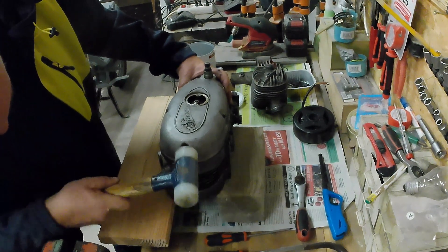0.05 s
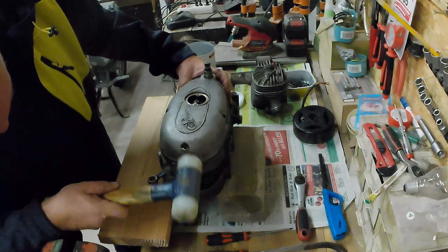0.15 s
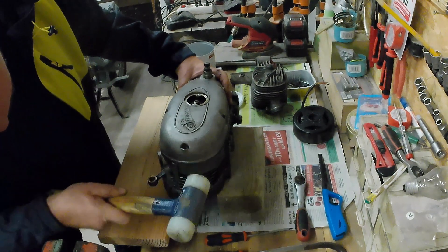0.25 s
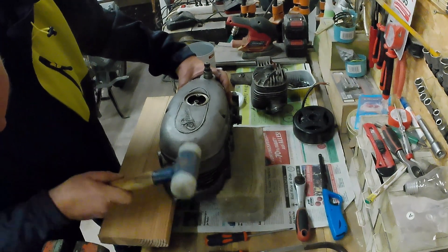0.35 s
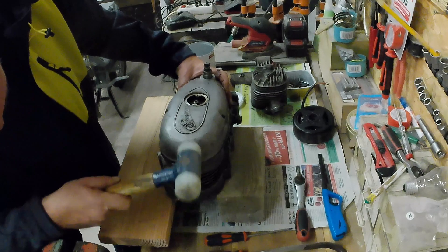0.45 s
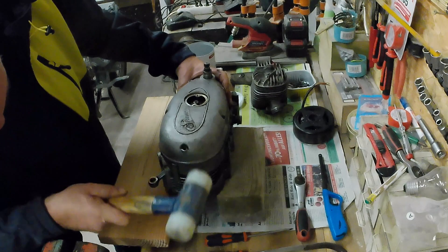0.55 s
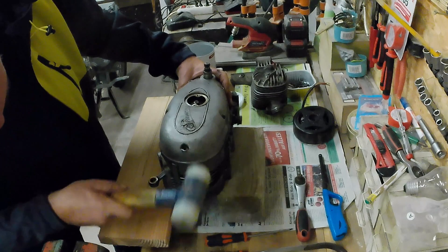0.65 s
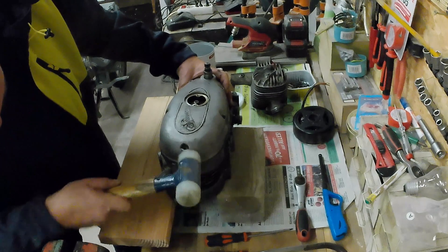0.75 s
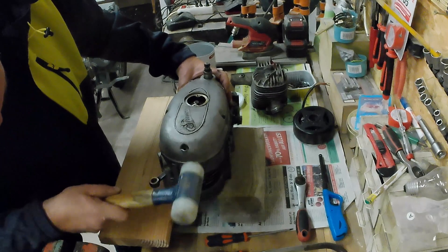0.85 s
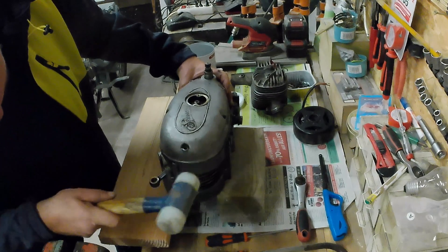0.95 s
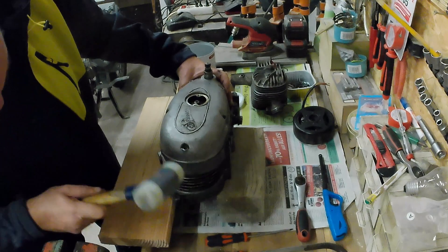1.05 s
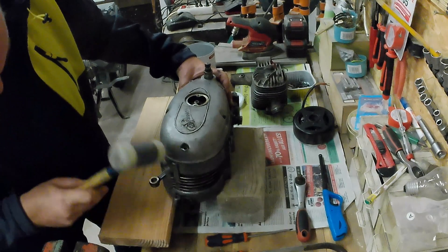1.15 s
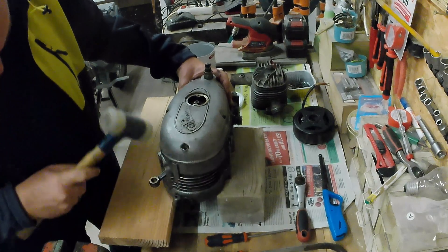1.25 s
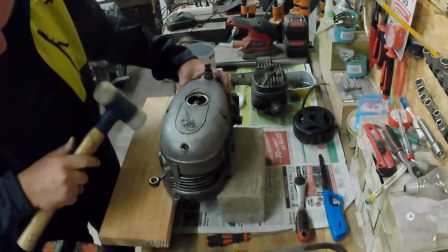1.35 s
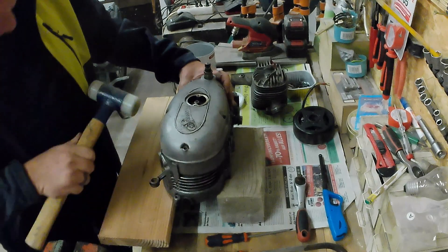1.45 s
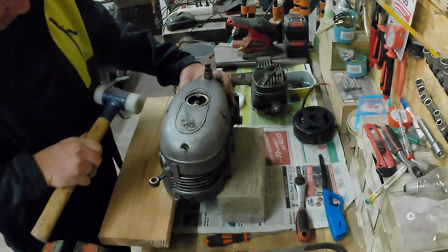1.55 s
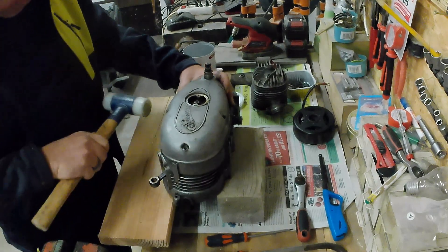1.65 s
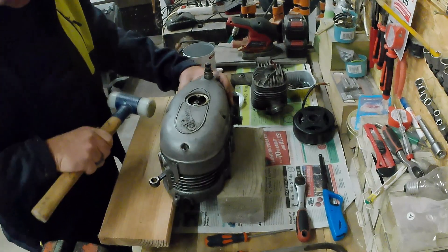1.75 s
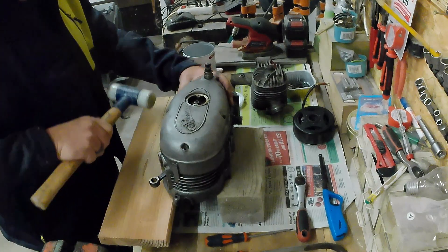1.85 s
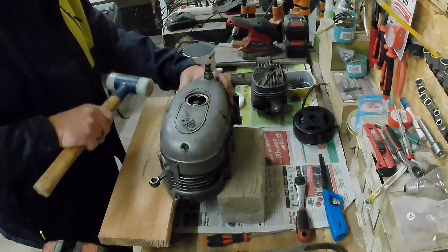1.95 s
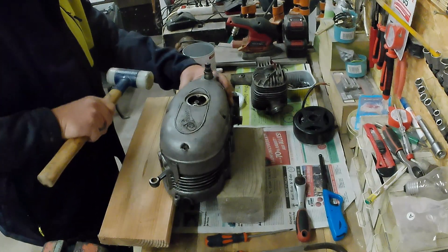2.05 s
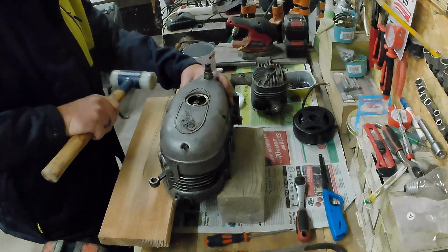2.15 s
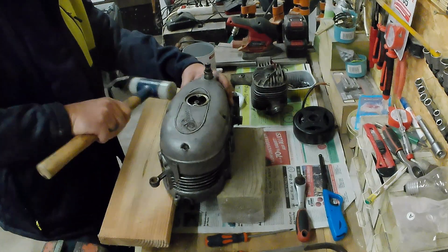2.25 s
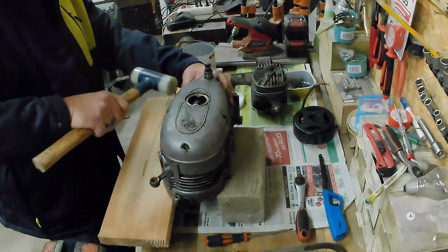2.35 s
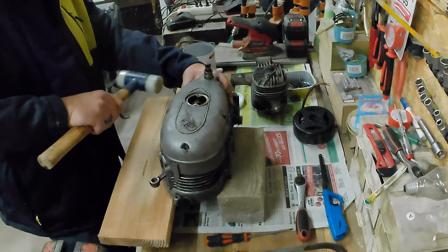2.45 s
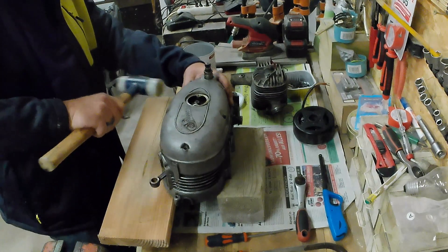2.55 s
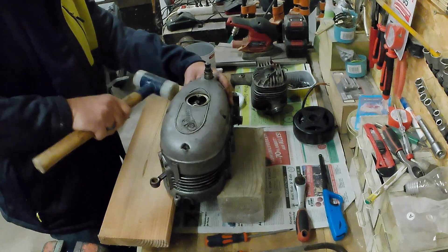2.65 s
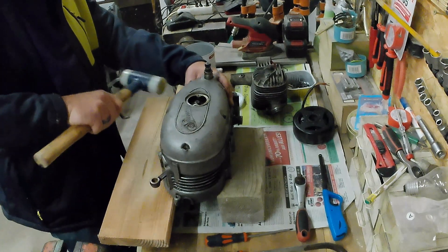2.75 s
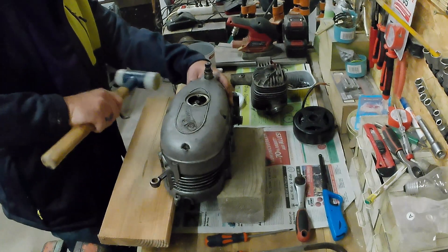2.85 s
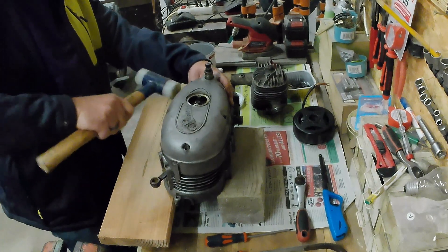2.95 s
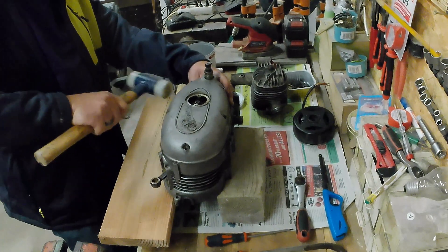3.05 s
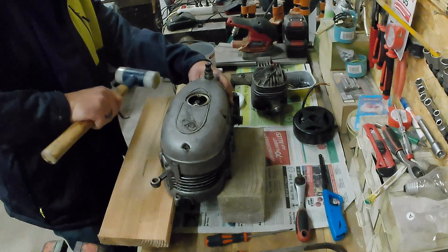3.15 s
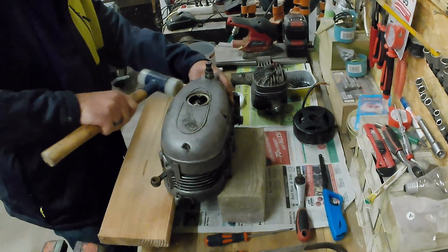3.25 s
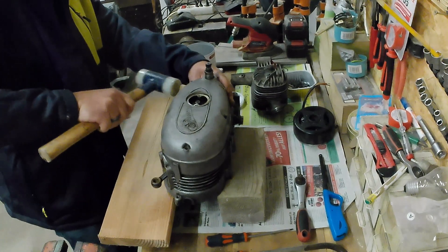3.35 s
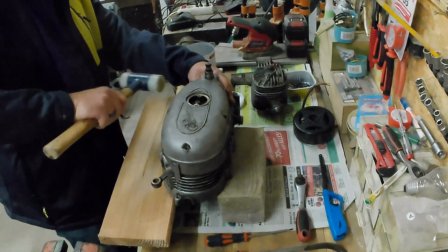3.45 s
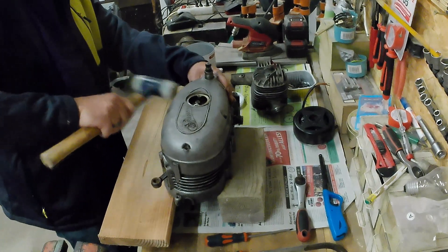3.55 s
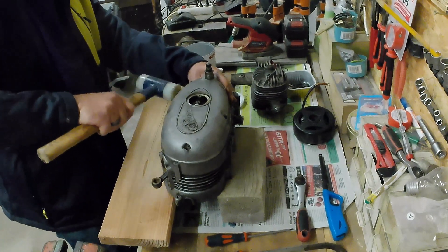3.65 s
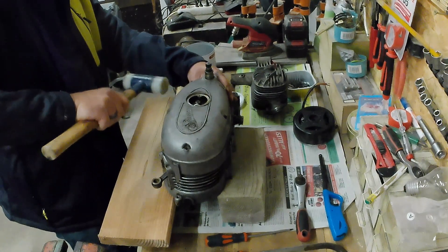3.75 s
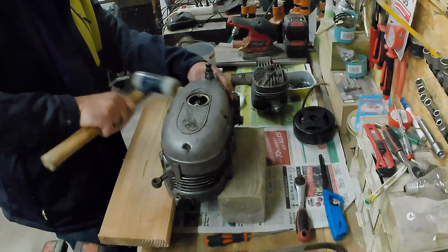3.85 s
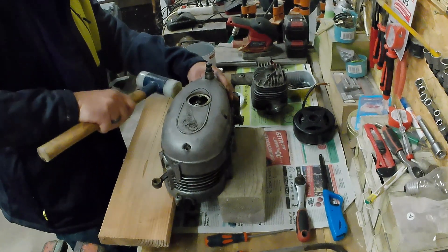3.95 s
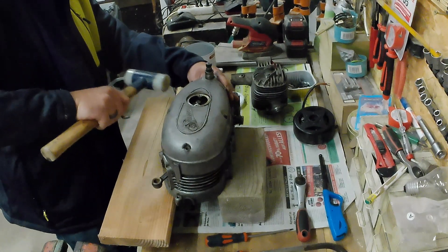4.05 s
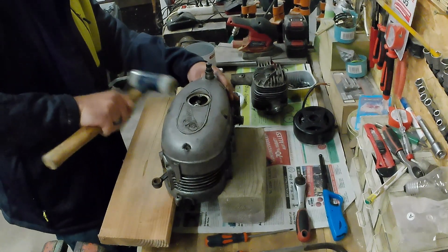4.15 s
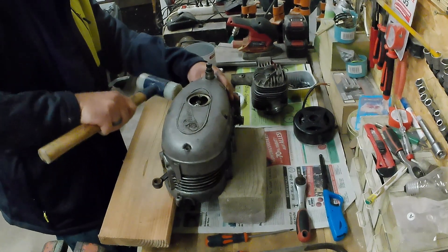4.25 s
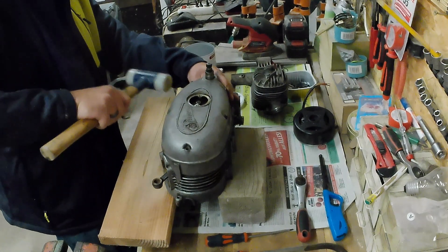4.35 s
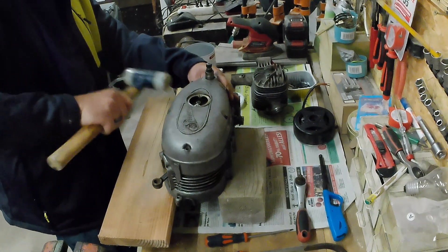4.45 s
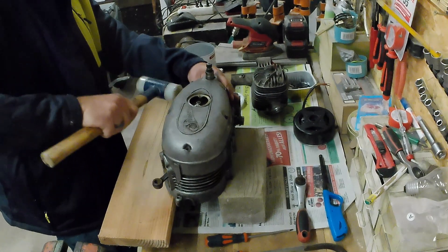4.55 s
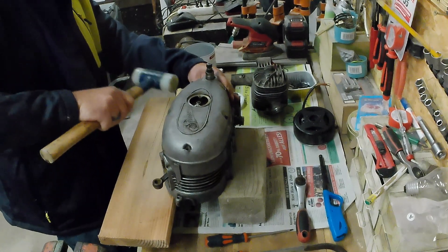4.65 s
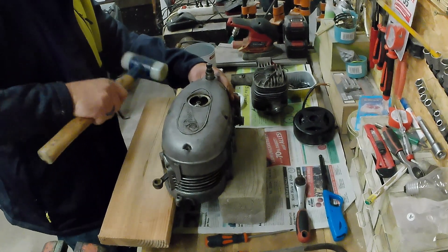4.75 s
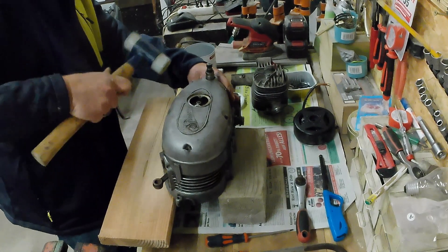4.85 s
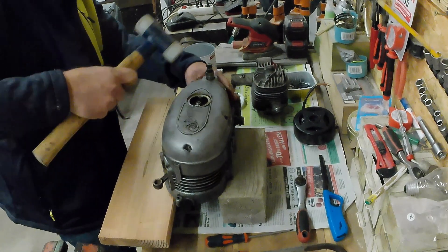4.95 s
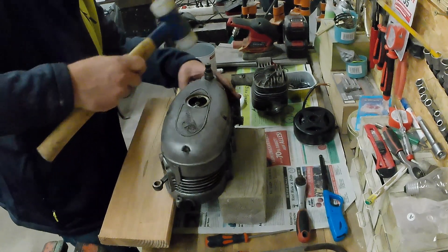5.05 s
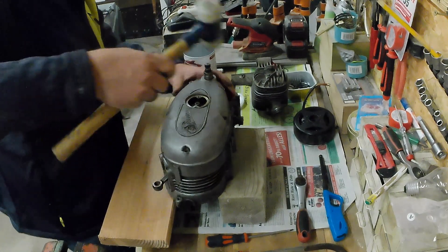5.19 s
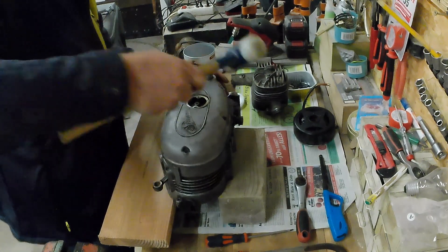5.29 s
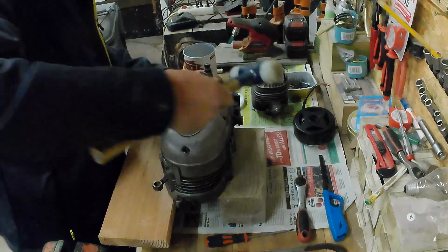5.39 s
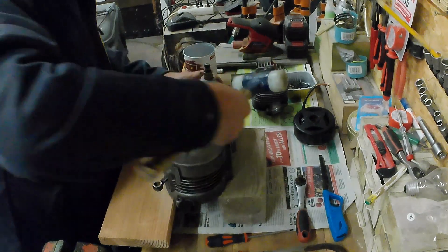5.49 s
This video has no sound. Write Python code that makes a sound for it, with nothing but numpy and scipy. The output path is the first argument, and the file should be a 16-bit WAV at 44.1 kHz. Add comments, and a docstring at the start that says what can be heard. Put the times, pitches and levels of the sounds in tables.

```python
"""A soft-faced dead-blow mallet taps an aluminium engine case that lies on wooden blocks on a workbench.
Four blows land on the near end (of the first only the tail is heard), then eight on the side: decaying
modes ring the case and boom in bench and workshop, with a noise crack and a diffuse noise tail.
Loose shot knocks and clatters in the head on the swing before each later blow. Between the two runs the
mallet is turned round with knocks and grain swells; faint ticks, rubs and room tone lie underneath."""
import sys
import numpy as np
from scipy import signal
from scipy.fft import rfft, irfft
from scipy.io import wavfile
from scipy.ndimage import minimum_filter1d

SR = 44100
rng = np.random.default_rng(int(sys.argv[2]) if len(sys.argv) > 2 else 0)


def transcribe(u):
    """Save the signal u as a 16-bit wav file named by the first command-line argument.

    u: samples, shape (n,) or (channels, n), limited to [-1, 1]; the rate is SR.
    q: integer samples, one column per channel.
    """
    v = np.clip(np.atleast_2d(u).T, -1, 1)
    q = np.round(v * 32767).astype(np.int16)
    wavfile.write(sys.argv[1], SR, q)


N = 243431   # length in samples
AGE = np.arange(int(1.2 * SR)) / SR   # seconds since a contact


def from_db(db):
    """Decibels to gain."""
    return 10 ** (np.asarray(db) / 20)


def rms_one(x):
    """Scale to unit rms."""
    return x / np.sqrt(np.mean(x ** 2) + 1e-20)


def fade(t60):
    """Exponential decay that falls 60 dB in t60 seconds."""
    return from_db(-60 * AGE / t60)


def add(track, s, sound):
    """Mix a sound into a track from time s on; one that began before zero is heard only as its tail."""
    start = round(s * SR)
    heard = sound[..., max(-start, 0):N - start]
    first = max(start, 0)
    track[..., first:first + heard.shape[-1]] += heard


def coloured(noise, hz, gains):
    """Shape noise by gains given at a few frequencies, joined along log frequency."""
    log_hz = np.log(np.maximum(np.fft.rfftfreq(noise.shape[-1], 1 / SR), 1))
    gain = np.interp(log_hz, np.log(hz), gains)
    return irfft(rfft(noise) * gain, noise.shape[-1])


def tinted(noise, spectrum):
    """Give noise a spectrum of (Hz, dB) points, joined by straight lines in dB."""
    hz, db = np.transpose(spectrum)
    fine_hz = np.geomspace(10, SR / 2, num=300)
    fine_db = np.interp(np.log(fine_hz), np.log(hz), db)
    return coloured(noise, fine_hz, from_db(fine_db))


def treble(x, edge_hz):
    """The part of a sound above a gentle edge."""
    return signal.sosfilt(signal.butter(1, edge_hz, "high", fs=SR, output="sos"), x)


def brighter(x, db, low_hz, high_hz):
    """Lift or lower a broad band of the sound."""
    band = signal.butter(1, [low_hz, high_hz], "band", fs=SR, output="sos")
    return x + (from_db(db) - 1) * signal.sosfilt(band, x)


def leftward(x, db, lag_ms):
    """From the left: middle and treble are louder in the left channel, and the right one lags."""
    band = signal.butter(1, [390, 7000], "band", fs=SR, output="sos")
    shaded = signal.sosfilt(band, x)
    left = x + (from_db(db / 2) - 1) * shaded
    right = x + (from_db(-db / 2) - 1) * shaded
    i = np.arange(len(x))
    return np.array([left, np.interp(i - lag_ms * SR / 1000, i, right)])


def ring(modes, column, spread_db, detune):
    """Decaying modes of alternating sign; each contact varies their levels and pitches a little."""
    out = np.zeros(len(AGE))
    chances = rng.standard_normal((len(modes), 2))
    for k, (mode, (level_chance, pitch_chance)) in enumerate(zip(modes, chances)):
        pitch_hz, t60 = mode[0] * (1 + detune * pitch_chance), mode[1]
        age = AGE[:int(1.5 * t60 * SR)]   # the mode is 90 dB down by then
        height = from_db(mode[column] + spread_db * level_chance - 60 * age / t60)
        out[:len(age)] += (-1) ** k * height * np.sin(2 * np.pi * pitch_hz * age)
    return out


# modes of the engine case; hand and blocks damp the strong ones, a few weak ones ring on:
# pitch_hz, t60_s, end_level_db (struck at the near end), side_level_db (struck at the side)
CASE_MODES = [(77, 0.012, -7.5, -41), (165.2, 0.082, -2.5, -5), (114, 0.1, -13.5, -19),
              (204.7, 0.16, -3.5, -8.5), (362.4, 0.16, -17.5, -15.5), (522, 0.037, -4, -16),
              (676, 0.02, -8.5, -4.5), (795, 0.024, -2, -3.5), (1058.5, 0.038, -6, -7),
              (1105, 0.015, -9.5, -13.5), (1320, 0.039, -11.5, -14.5), (1740, 0.028, -24.5, -16.5),
              (2010, 0.013, -28, -17.5), (2494, 0.026, -33, -23.5), (2664, 0.013, -28, -20.5),
              (3415, 0.0084, -58, -18), (4330, 0.0023, -26.5, -23), (5900, 0.011, -44, -31.5),
              (3810, 0.012, -50, -22), (11600, 0.016, -27, -32.5), (1085, 0.17, -27, -31),
              (1240, 0.21, -37, -33.5), (1953, 0.13, -35, -36), (2230, 0.25, -53, -54),
              (2510, 0.2, -56, -49), (2700, 0.18, -50, -51), (2880, 0.17, -50, -52), (3580, 0.33, -65, -51),
              (3820, 0.16, -62, -53.5), (4160, 0.13, -63, -50.5), (4360, 0.17, -52.5, -52),
              (5130, 0.22, -62.5, -56), (5690, 0.18, -66, -50)]


def case_ring(place):
    """The struck metal rings in the modes that this place excites."""
    return ring(CASE_MODES, 2 + place, spread_db=1.6, detune=0.0023)


def crack():
    """The contact itself: one sharp click and a short sizzle, rounded by the soft face."""
    click = from_db(-15) * fade(0.001)
    sizzle_level = from_db(-48.5) * fade(0.003) + from_db(-37) * fade(0.075)
    sizzle = rng.standard_normal(len(AGE)) * sizzle_level
    soft_face = signal.butter(1, 11000, fs=SR, output="sos")
    return signal.sosfilt(soft_face, treble(click + sizzle, edge_hz=1800))


# booming modes of bench and room, levels before the build-up:
# pitch_hz, t60_s, end_level_db (struck at the near end), side_level_db (struck at the side)
BOOM_MODES = [(28.2, 0.44, -35, -20), (54.26, 0.64, -18, -12), (57.96, 0.97, -7, -32),
              (62.56, 0.72, -17.5, -10.5), (73.6, 1.35, -20, -24), (81.3, 1.15, -36, -21),
              (107.2, 0.46, -11.5, -21.5), (116.1, 1.84, -25.5, -31), (116.8, 0.4, -23, -6),
              (139.3, 0.72, -35, -22), (158, 0.84, -19.5, -18.5), (191, 0.52, -19.5, -17),
              (199, 0.504, -7.5, -30), (205.6, 0.55, -24, -16), (233, 0.31, -13, -33),
              (251.8, 0.51, -27, -26.5), (312.8, 0.49, -41.5, -23.5), (328, 0.56, -29.5, -29.5),
              (378.4, 0.57, -35, -23), (398.6, 0.46, -27.5, -24.5), (430, 0.59, -32.5, -25.5),
              (463, 0.54, -28.5, -27), (500, 0.53, -27.5, -28), (557.6, 0.44, -28, -22.5),
              (680, 0.37, -26, -26), (832, 0.28, -22.5, -25.5), (960, 0.47, -32, -26),
              (1052, 0.37, -27, -26.5), (1376, 0.49, -32, -37.5), (1540, 0.44, -44, -42)]
# time constant of the boom's build-up, per place: end_s, side_s
BOOM_BUILD_S = (0.049, 0.027)


def boom(place):
    """Bench and room modes swell up after the blow, then ring away."""
    build = 1 - np.exp(-AGE / BOOM_BUILD_S[place])
    return ring(BOOM_MODES, 2 + place, spread_db=2.5, detune=0.0033) * build


def scattered(rows, clump_db):
    """Trains of reflections: the early ones arrive in clumps, the late ones blend."""
    marks = np.arange(0, 1.21, .002)   # a new clump value every 2 ms
    clumps = np.array([np.interp(AGE, marks, rng.standard_normal(len(marks))) for _ in range(rows)])
    return rng.standard_normal((rows, len(AGE))) * from_db(clump_db * clumps * np.exp(-AGE / 0.12))


# bands of the diffuse workshop sound, with the noise gain for a blow on either place:
# band_hz, t60_s, end_gain_db, side_gain_db
TAIL_BANDS = [(40.6, 1, 2, 1), (126, 0.76, 7, 4), (240, 0.56, 2, 4.5), (500, 0.52, -4.5, -2),
              (950, 0.5, -7.5, -5), (1290, 0.52, -12.5, -9), (1506, 0.44, -14, -17),
              (2120, 0.45, -31.5, -26.5), (2835, 0.51, -28.5, -28), (3000, 0.42, -43, -33),
              (6270, 0.41, -45.5, -42.5), (7800, 0.22, -63, -61), (10700, 0.28, -50, -50.5),
              (12700, 0.17, -43, -44.5), (13000, .14, -47, -65), (16000, .12, -42, -52.5)]


def dying(noise, build_s, build_cycles):
    """Reflections gather, the lows more slowly, then each band dies at the room's rate."""
    hz, t60 = np.transpose(TAIL_BANDS)[:2]
    out = np.zeros(len(AGE))
    for band, band_hz, band_t60 in zip(np.eye(len(hz)), hz, t60):
        build = 1 - np.exp(-AGE / (build_s + build_cycles / band_hz))
        out += coloured(noise, hz, band) * fade(band_t60) * build
    return out


# blows of the mallet: start_s, hardness_db (treble lift), place (0 near end, 1 side)
BLOWS = [(-0.235, -3, 0), (0.1059, 3, 0), (0.4413, 1.5, 0), (0.7925, 12, 0), (2.356, -8.5, 1),
         (2.6975, 1, 1), (3.01, 0.5, 1), (3.3462, 2.5, 1), (3.6623, 6, 1), (3.9610, 3.5, 1), (4.2691, 6, 1),
         (4.5826, 7, 1)]
# overall gain of the blows, per place: end_db, side_db
STRENGTH_DB = (-0.4, -0.63)


def blows():
    """Each blow rings the case, cracks at the contact and sets bench and room booming."""
    out = np.zeros((2, N))
    paths = scattered(2, clump_db=-1.5)   # blows on one place share most of their reflections
    for s, hardness_db, place in BLOWS:
        place = int(place)
        own_path = scattered(1, clump_db=-6.5)[0]
        direct = leftward(case_ring(place) + crack(), db=(1.6, 6.0)[place], lag_ms=0.029)
        spectrum = np.array(TAIL_BANDS)[:, [0, 2 + place]]
        reflections = tinted(0.9 * paths[place] + 0.44 * own_path, spectrum)
        room = dying(reflections, build_s=0.0039, build_cycles=4.3)
        blow = brighter(direct + boom(place) + room, hardness_db, low_hz=2160, high_hz=6350)
        add(out, s, from_db(STRENGTH_DB[place]) * blow)
    return out


# relative spectrum of the room tone: pitch_hz, gain_db
FLOOR_COLOUR = [(12, -40), (20, -11.5), (60, 1.5), (110, -10.5), (154, -16.5), (204, -11), (228, -24),
                (410, -19.5), (558, -28.5), (802, -27.5), (873, -29), (1260, -31.5), (2020, -40.5),
                (5380, -50), (16000, -57)]


def room_tone():
    """Low rumble and hiss from shaped noise, nearly alike on both sides."""
    mid, side = rms_one(tinted(rng.standard_normal((2, N)), FLOOR_COLOUR))
    width = from_db(-29.5) * treble(side, edge_hz=1500)
    return from_db(-39) * (mid + width * [[1], [-1]])


# the mallet's own modes, levels for a contact of 0 dB:
# pitch_hz, t60_s, outside_level_db (knocked from outside), inside_level_db (struck by the shot)
MALLET_MODES = [(110.3, 0.42, -31, -46), (690, 0.026, -20, -36), (1025, 0.036, -16, -35),
                (1360, 0.026, -18, -32), (1527, 0.017, -26, -30), (1693, 0.022, -19, -34),
                (2004, 0.02, -25.5, -38.5), (2130, 0.09, -38, -56.5), (2790, 0.02, -39, -44),
                (3400, 0.014, -39.5, -48.5), (3900, 0.014, -43, -50)]


def mallet_ring(column, detune):
    """The mallet's modes ring after a knock from outside (column 2) or from the shot inside (3)."""
    return ring(MALLET_MODES, column, spread_db=2, detune=detune)


# modes of a pellet's click, for a click of 0 dB: pitch_hz, t60_s, level_db
PELLET_MODES = [(5490, 0.01, -37.5), (5960, 0.006, -39), (11300, 0.0062, -43.5)]


def pellet_click():
    """One pellet rings in a few short, high modes."""
    return ring(PELLET_MODES, column=2, spread_db=4, detune=0.04)


# downswings, each with the levels of its first knock and first click: start_s, knock_db, pellet_db
SWINGS = [(0.013, -10.5, -17.5), (0.349, -7.5, -23), (0.684, -1, -19.5), (2.313, -3, -6.5),
          (2.633, -2.5, -1.5), (2.943, -2, -11.5), (3.280, -1.5, -12), (3.598, -1.5, -7.5),
          (3.908, -2, -14), (4.217, -3, -15), (4.528, 3, -5)]
SWING_GAP_S, SWING_LOSS_DB = 0.0033, 4     # from one knock of a swing to the next
PELLET_GAP_S, PELLET_LOSS_DB = 0.0012, 2   # from one pellet to the next


def swings():
    """Each downswing throws the shot back in the head: a few uneven knocks, and a clatter of pellets."""
    out = np.zeros(N)
    for s, knock_db, pellet_db in SWINGS:
        for k, slip in enumerate(rng.uniform(-.2, .2, size=4)):
            knock = mallet_ring(column=3, detune=0.02)
            add(out, s + k * (1 + slip) * SWING_GAP_S, from_db(knock_db - k * SWING_LOSS_DB) * knock)
        for k, slip in enumerate(rng.uniform(-2, 1, size=10)):
            level = from_db(pellet_db - k * PELLET_LOSS_DB)
            add(out, s + (k + slip) * PELLET_GAP_S, level * pellet_click())
    return out


# knocks in the mallet as it is turned round and gripped anew: start_s, level_db
KNOCKS = [(1.142, -21), (1.1635, -16.5), (1.196, -19.5), (1.383, -20.5), (1.5279, -5.5), (1.608, -19.5),
          (1.7247, -24), (1.8386, -23)]
# every knock is a double contact and a bounce: delay_s, level_db (relative to the knock)
CONTACTS = [(0, -4.5), (.00345, 0.5), (.0098, -5)]
KNOCK_HARDNESS_DB, HARDNESS_PER_DB = 10.5, 1.25   # treble lift of a 0 dB knock; lighter ones get less


def knocks():
    """Light contacts ring the mallet; the softer the knock, the duller its upper modes."""
    out = np.zeros(N)
    for s, level_db in KNOCKS:
        hardness_db = KNOCK_HARDNESS_DB + HARDNESS_PER_DB * level_db
        for delay_s, contact_db in CONTACTS:
            knock = mallet_ring(column=2, detune=0.006)
            knock = brighter(knock, hardness_db, low_hz=1440, high_hz=3370)
            add(out, s + delay_s, from_db(level_db + contact_db) * knock)
    return out


# relative spectrum of the shot: pitch_hz, gain_db
SHOT_COLOUR = [(150, 4), (500, 5), (850, 3.5), (1200, 4), (1600, 0.5), (2200, -4.5), (3000, -13.5),
               (4500, -19), (6000, -21.5), (7500, -42), (16000, -52)]
# the mallet is tilted and its shot slides over: peak_s, level_db, half_length_s
TILTS = [(1.175, -45.5, 0.025), (1.315, -47, 0.036), (1.43, -41.5, 0.038), (5.2, -51.5, 0.023)]


def shot():
    """Tiny grains collide as the mallet head tilts: a quick swell, a slower settling."""
    out, t = np.zeros(N), np.arange(N) / SR
    collisions = (rng.random(N) < 5000 / SR) * rng.standard_normal(N)   # about 5000 a second
    grains = rms_one(tinted(collisions, SHOT_COLOUR))
    for s, db, half_s in TILTS:
        phase = np.clip((t - s) / half_s, -20, 20)
        swell = np.exp(np.where(phase < 0, -phase ** 2, -.8 * phase))
        out += from_db(db) * swell * grains
    return out


# dry ticks after some of the blows on the side, levels before the low cut: start_s, level_db
TICKS = [(2.813, -40), (3.046, -26), (3.069, -35), (3.440, -37), (3.695, -29), (3.719, -22), (3.997, -34),
         (4.044, -36)]


def ticks():
    """Faint, dry ticks: millisecond decays with the lows cut away."""
    out = np.zeros(N)
    for s, db in TICKS:
        add(out, s, from_db(db) * fade(0.001))
    return treble(out, edge_hz=4000)


# the hand shifts on the case: peak_s, level_db, half_length_s, centre_hz
RUBS = [(5.08, -43, 0.015, 487), (5.204, -43, 0.012, 800)]
RUB_WIDTH = 1.34   # upper edge of a rub over its centre


def rubs():
    """Faint, hollow rubs as the hand shifts on the case: narrow noise that swells and fades."""
    out = np.zeros(N)
    for s, db, half_s, hz in RUBS:
        swell = np.exp(-.5 * ((np.arange(N) / SR - s) / half_s) ** 2)
        band = signal.butter(2, [hz / RUB_WIDTH, hz * RUB_WIDTH], "band", fs=SR, output="sos")
        out += from_db(db) * swell * rms_one(signal.sosfilt(band, rng.standard_normal(N)))
    return out


def scene():
    """Blows, handling sounds with reflections of the mallet's knocks and shot, and room tone."""
    rattle = shot()
    knock = swings() + knocks()
    reflections = dying(rng.standard_normal(len(AGE)), build_s=0.0011, build_cycles=1.1)
    echo = signal.fftconvolve(from_db(-28.5) * rattle + from_db(-39) * knock, reflections)[:N]
    return blows() + room_tone() + knock + rattle + echo + ticks() + rubs()


def gain_control(x, boost_db, threshold_db, hold_s, release_db_per_s):
    """Quiet passages are lifted; a loud peak takes the lift away, and it returns after a pause."""
    level_db = 20 * np.log10(np.abs(x).max(axis=0) + 1e-6)
    cut_db = np.clip(level_db - threshold_db, 0, boost_db)
    size = 2 * int(hold_s * SR / 2) + 1
    # the largest cut of the past hold time
    held_db = -minimum_filter1d(-cut_db, size, origin=size // 2, mode="constant")
    # after the hold the cut shrinks at a steady rate
    ramp_db = release_db_per_s * np.arange(N) / SR
    released_db = np.maximum.accumulate(held_db + ramp_db) - ramp_db
    return x * from_db(boost_db - released_db)


def record(dry):
    """Gain control, rounded peaks, and a steep top cut."""
    x = gain_control(dry, boost_db=3.5, threshold_db=-5.0, hold_s=0.17, release_db_per_s=6)
    x = x / (1 + np.abs(x) ** 6) ** (1 / 6)
    top_cut = signal.ellip(10, .1, 80, 16000, fs=SR, output="sos")   # 0.1 dB ripple, 80 dB down
    return signal.sosfilt(top_cut, x)


dry = scene()
out = record(dry)
transcribe(out)
```